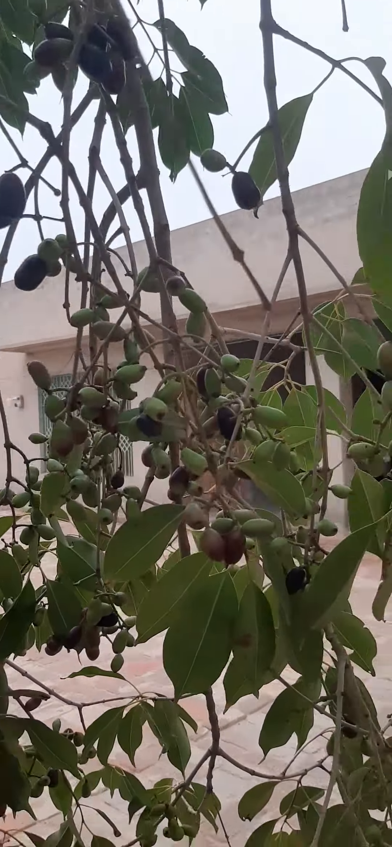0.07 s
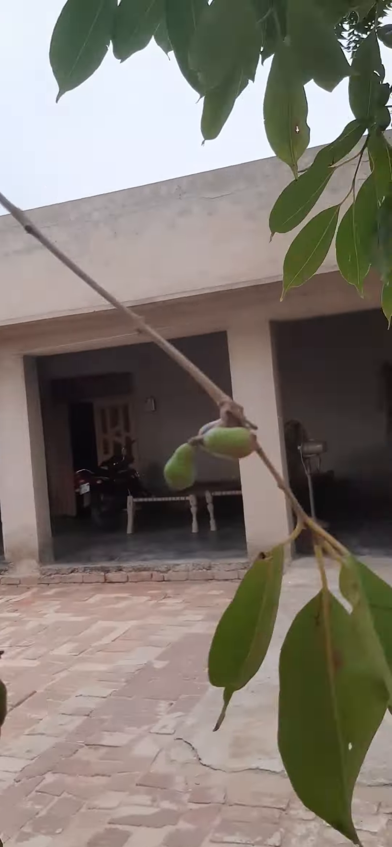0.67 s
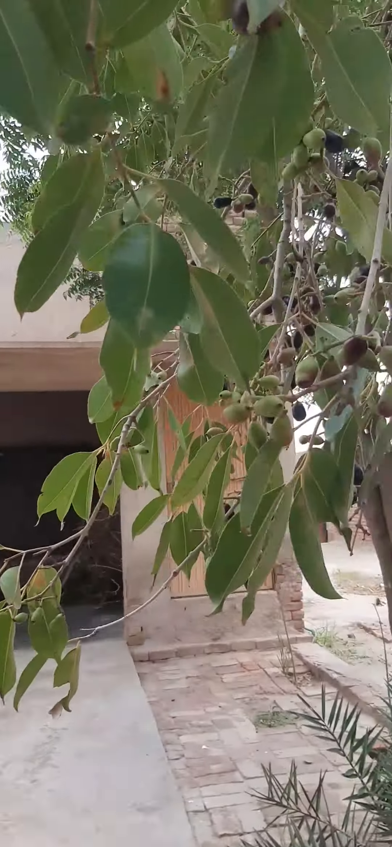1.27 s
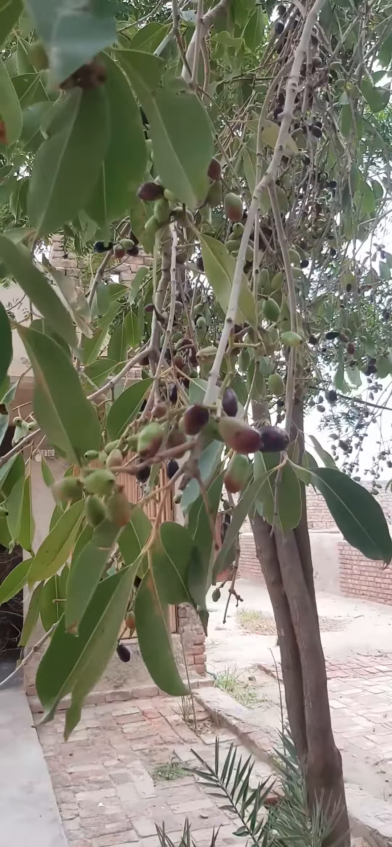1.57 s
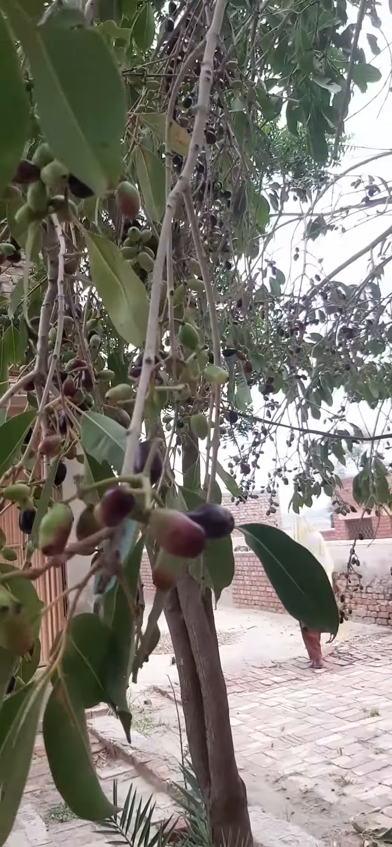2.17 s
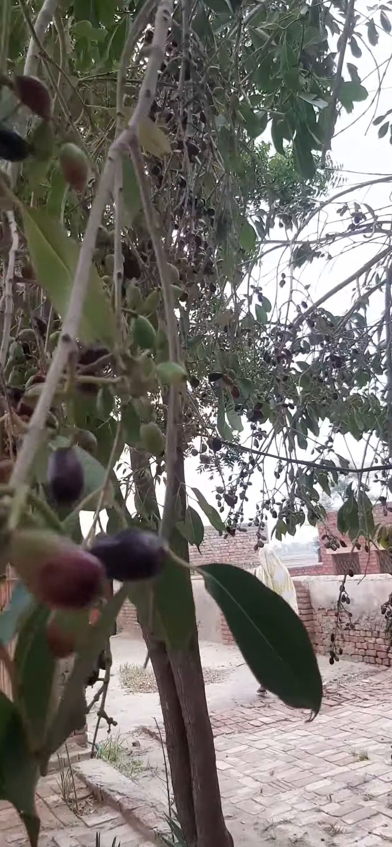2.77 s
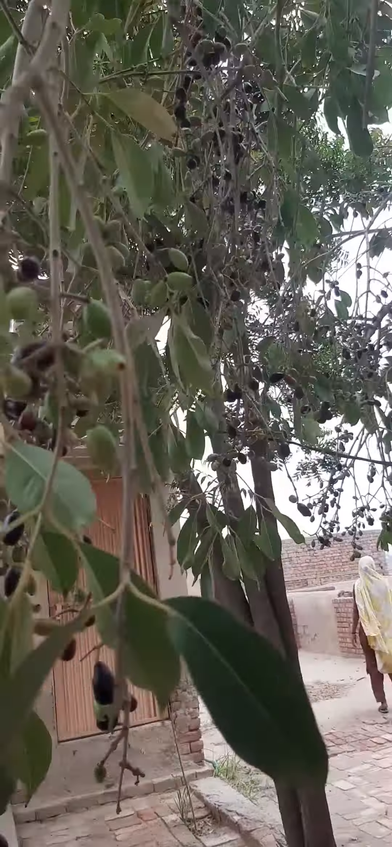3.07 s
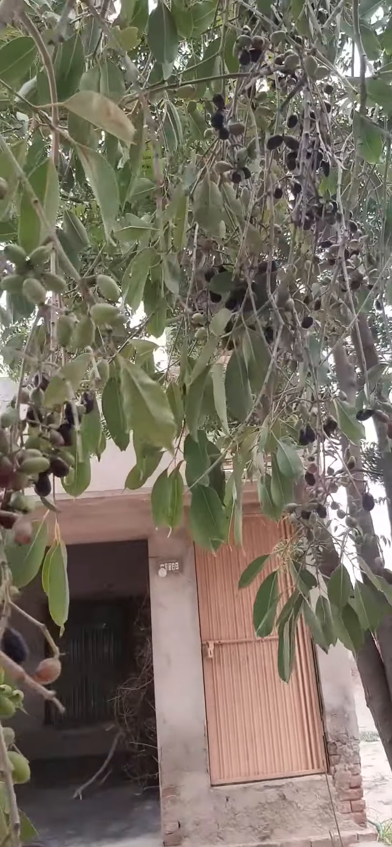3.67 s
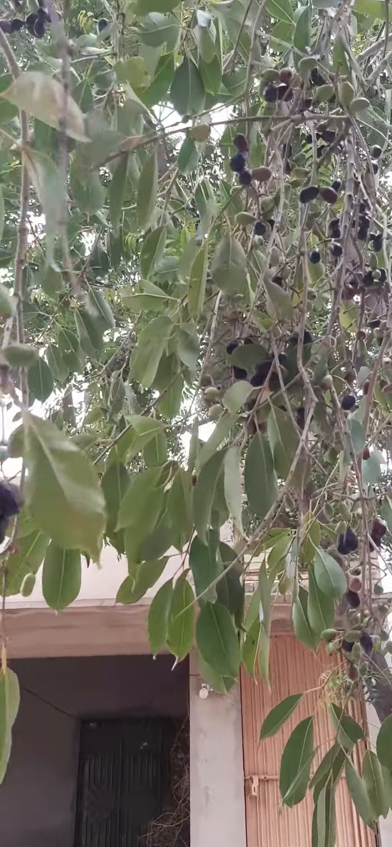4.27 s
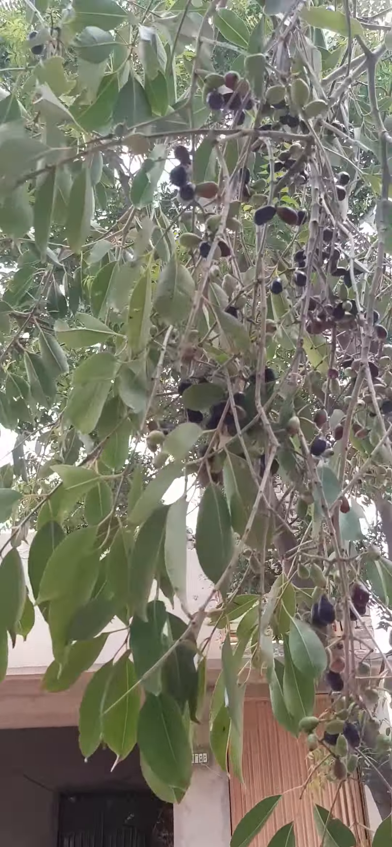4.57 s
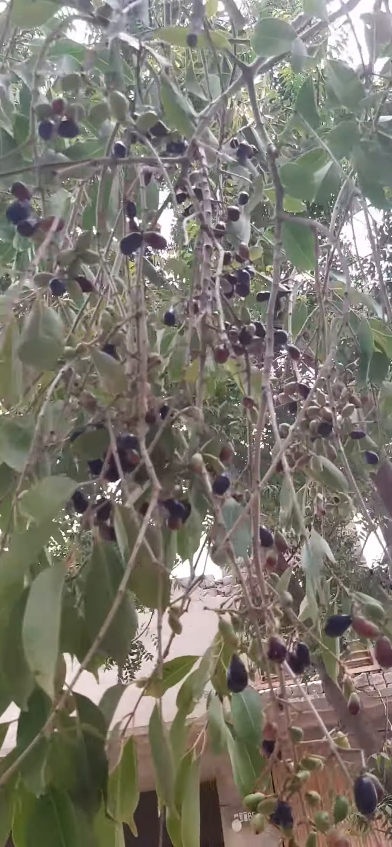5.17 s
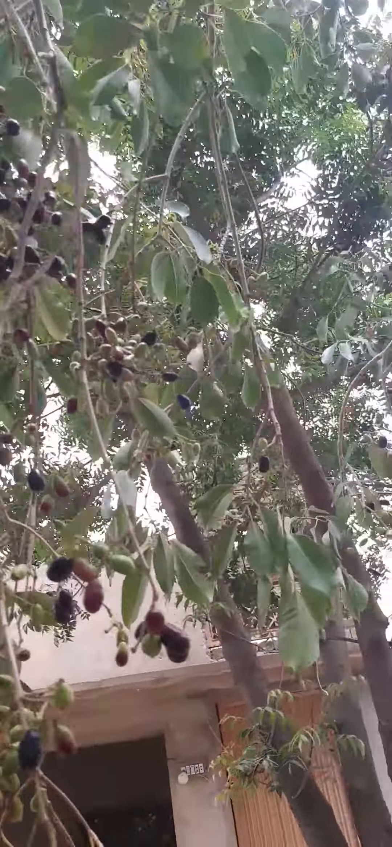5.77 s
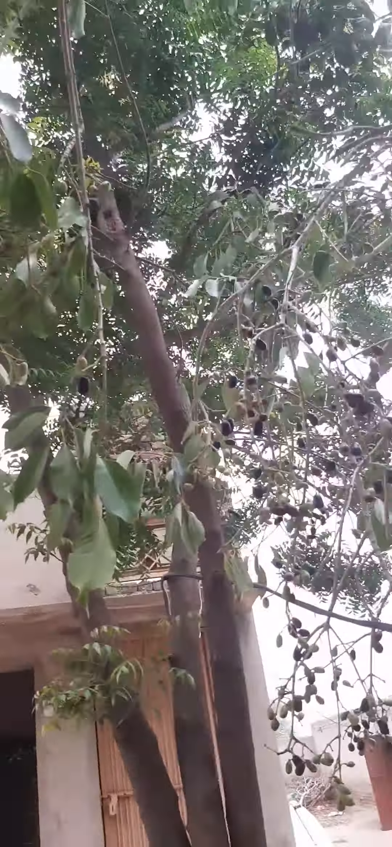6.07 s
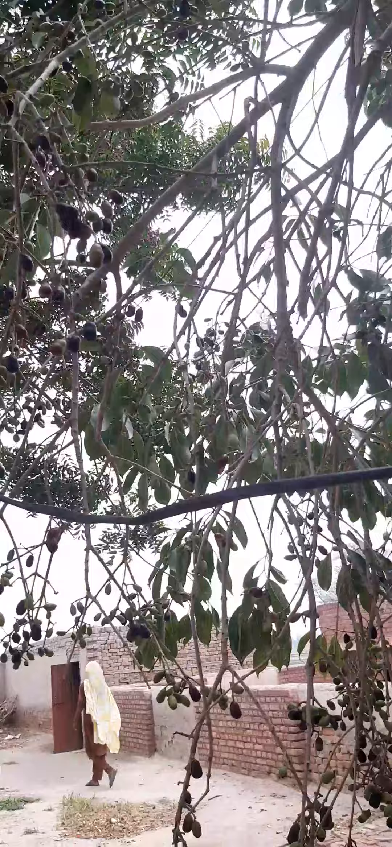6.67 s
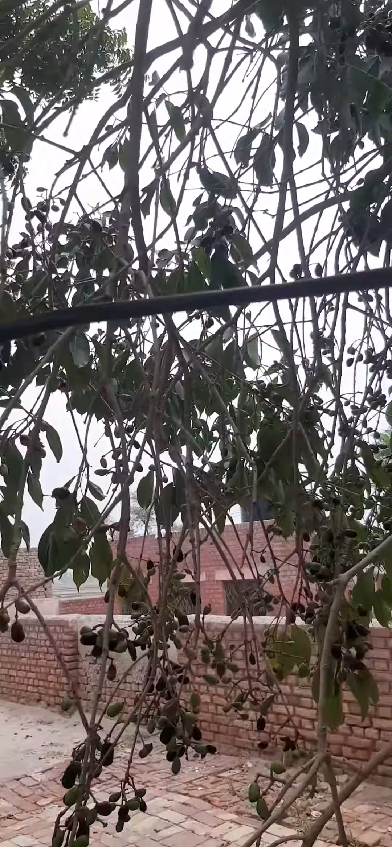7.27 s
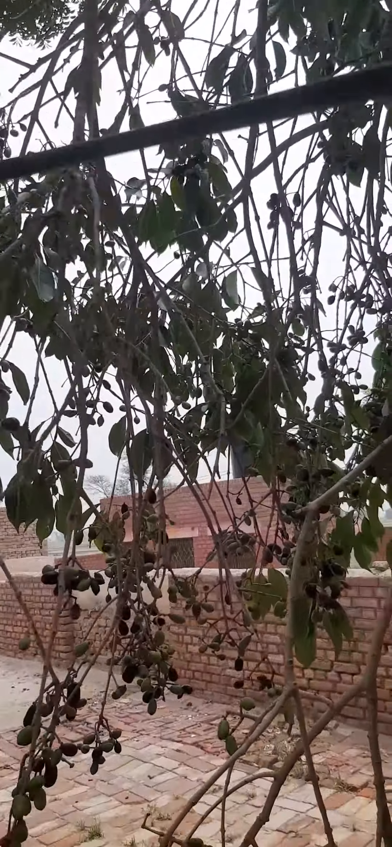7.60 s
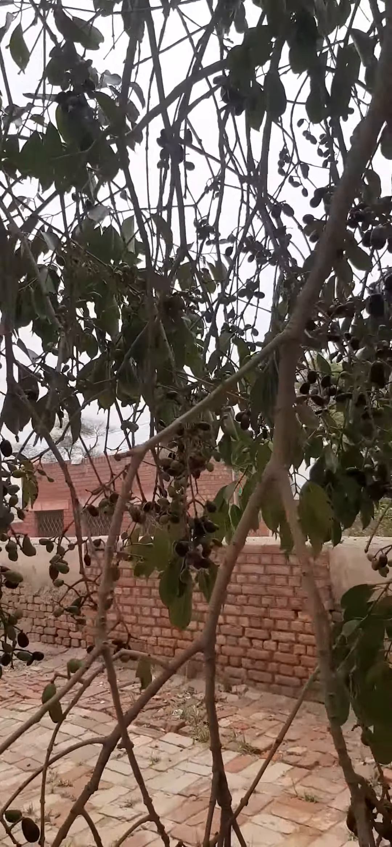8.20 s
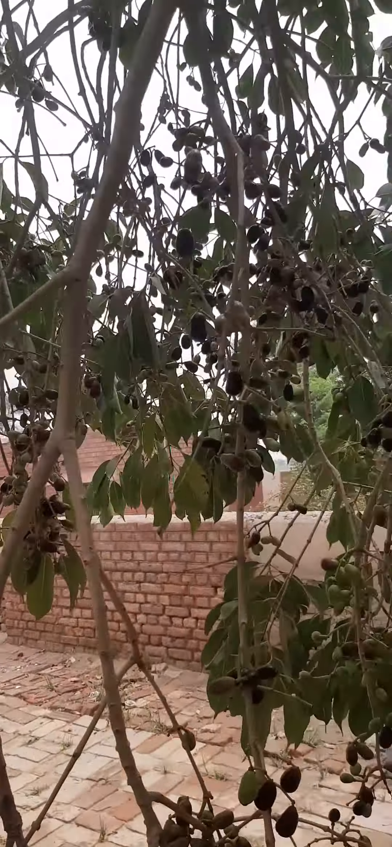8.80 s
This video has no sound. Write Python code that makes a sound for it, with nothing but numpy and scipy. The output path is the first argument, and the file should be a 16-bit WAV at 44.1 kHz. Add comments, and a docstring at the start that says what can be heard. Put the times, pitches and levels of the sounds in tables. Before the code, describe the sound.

Outdoors in a walled yard, a crow caws three times, the middle call softer, then twice after a pause and once near the end. Between calls, leaves swish and twigs click near the microphone, with a few dull handling bumps. Another crow and a few birds sound faintly far off. A low rumble runs throughout, joined in the second half by a distant engine.

```python
"""Crows in a brick courtyard

A crow caws harshly from a tree, its syrinx pulses filtered by throat and beak; the walls scatter and
echo each caw, and a second crow answers from afar. Leaves flick and rustle and twigs click close to a
hand-held microphone, which takes a few soft bumps and knocks. Behind lie a few far birds, a distant
engine that revs and fades, and a low village rumble."""
import sys
import numpy as np
from scipy import signal
from scipy.fft import rfft, irfft, next_fast_len
from scipy.io import wavfile
from scipy.ndimage import uniform_filter1d, minimum_filter1d, map_coordinates

SR = 44100
rng = np.random.default_rng(int(sys.argv[2]) if len(sys.argv) > 2 else 0)


def log_audio(samples):
    """Write samples as a 16-bit WAV file to the path given in sys.argv[1]."""
    # one column per channel
    frames = np.atleast_2d(samples).T
    # limit to full scale, then quantise
    limited = np.clip(frames, -1, 1)
    pcm = np.round(limited * 32767).astype(np.int16)
    wavfile.write(sys.argv[1], SR, pcm)


N = 389844
TIME = np.arange(N) / SR

# Caws: (time [s], length [s], nominal pitch [Hz], scoop time [s], level [dB], rattle rate [Hz],
# throat resonance [Hz], its height [dB], beak resonance [Hz], its height [dB], treble gain [dB],
# left port lag [ms], relative echo level [dB], tail gain [dB])
CAWS = [(0.298, 0.28, 521, .14, -28, 80, 1705, 5, 4100, 14.5, -2, -0.28, -17, -6.5),
        (.575, 0.24, 428.6, 0.029, -44, 72, 760, 6, 4170, 9, -11.5, -0.23, -12.5, -3),
        (1.049, 0.28, 503, 0.086, -28.5, 81, 1740, 4, 4090, 13.5, -1, -0.27, -41, -10),
        (3.88, 0.17, 472.4, .09, -62, 85, 2250, 5, 4200, 4, 3, 0, -30, 2.5),
        (4.305, 0.3, 499.6, 0.092, -29, 72, 1590, 3.5, 4100, 12, -2.5, 0.24, -37, -11),
        (5.07, 0.26, 477.2, 0.073, -27.5, 70.6, 1910, 7, 4170, 9, -2.5, 0.23, -36, -14.5),
        (6.571, .2, 446, .09, -59, 66, 1250, 16.5, 4200, 4, -9, 0, -30, -3),
        (7.164, 0.28, 508.4, 0.094, -50, 62, 1620, 10, 4170, 14, -3, -0.06, -23, 3),
        (8.495, 0.27, 487.5, 0.093, -30.5, 71, 1620, 2, 4220, 7.5, -0.5, -0.22, -4.5, -9)]
def crows():
    """Path difference: a caw reaches the two microphone ports a little apart, then its reflections."""
    out = np.zeros((2, N))
    for s, length, pitch_hz, scoop_s, db, *timbre, lag_ms, echo_db, tail_db in CAWS:
        call = amp(db) * caw(length, pitch_hz, scoop_s, *timbre)
        add(out, s, filtered(call, lambda hz: np.exp(1j * np.pi * np.outer([-1, 1], hz) * lag_ms / 1000)))
        add(out, s, signal.fftconvolve(call[None], courtyard(echo_db, tail_db), axes=1))
    return out


# Response of the throat and open beak: (frequency [Hz], gain [dB])
VOCAL_TRACT = [(520, -40), (750, -16.5), (1020, -17), (1200, -10), (1480, -6), (2000, 0.5), (2250, -6.5),
               (2550, -13.5), (3050, -27), (3650, -26.5), (4400, -23.5), (5200, -20.5), (5900, -14.5),
               (7200, -19), (16000, -38)]
def caw(length, pitch_hz, scoop_s, rattle_hz, throat_hz, throat_db, beak_hz, beak_db, treble_db):
    """Source-filter model: the sound of the syrinx rings through the throat, then the beak."""
    def throat(hz):
        formant_db = throat_db * peak(hz, throat_hz, width=150)
        shelf_db = along([(1900, 0), (3400, treble_db)], hz)
        return amp(along(VOCAL_TRACT, hz) + formant_db + shelf_db)
    voice = filtered(syrinx(length, pitch_hz, scoop_s, rattle_hz), throat)
    return unit(beak(voice, length, beak_hz, beak_db))


# Hiss in the syrinx: (frequency [Hz], mixing share [0-1])
HISS_SHARE = [(2000, .06), (5000, .11)]
def syrinx(length, pitch_hz, scoop_s, rattle_hz, drop_s=.08, attack_s=.066, sag_s=.081):
    """Modulation: an uneven rattle chops the pulses and tugs their pitch, giving harmonics sidebands."""
    size = int(length * SR)
    t = np.arange(size) / SR
    # the pitch scoops up, arches gently and drops away; the effort swells, holds and sags
    bend = 1 - .18 * ramp_down(t, scoop_s) ** 2 - .25 * ramp_down(length - t, drop_s) ** 2
    bend *= 1 + .06 * (np.sin(np.pi * t / length) - np.sin(np.pi / 3))
    effort_db = -20.5 * ramp_down(t, attack_s) ** 2 - 6.5 * ramp_down(length - t, sag_s)
    flap = phase_of(rattle_hz * (1 + .15 * wobble(89.9, size)))
    jitter = .018 * wobble(500, size)
    phase = phase_of(pitch_hz * bend * (1 + .05 * np.sin(flap) + jitter))
    pulses = unit(np.cos(np.outer(np.arange(1, 31), phase)).sum(0))
    hiss = unit(rng.standard_normal(size) * (1 + np.cos(phase)))
    voiced = filtered(pulses, lambda hz: np.sqrt(1 - along(HISS_SHARE, hz)))
    rasp = filtered(hiss, lambda hz: np.sqrt(along(HISS_SHARE, hz)))
    chop = np.exp(.35 * np.cos(flap))
    edges = np.clip(np.minimum(t, length - t) / .0016, 0, 1)
    return (voiced + rasp) * amp(effort_db) * chop * edges


# Upper resonances of the beak: (starting frequency [Hz], half-width [Hz], height [dB])
BEAK_FORMANTS = [(5870, 170, 2.5), (6430, 180, 2)]
def beak(x, length, beak_hz, beak_db, climb=.125, flicker_db=3, sag_db=3):
    """Formant shift: resonances climb as the beak opens; the treble flickers and dulls as air runs out."""
    hz, frames, spectra = signal.stft(x, SR, nperseg=512)
    progress, hz = frames / length, hz[:, None]
    rise = 1 + climb * progress ** 2
    formants = [(beak_hz, 145, beak_db), *BEAK_FORMANTS]
    db = sum(height * peak(hz, start_hz * rise, width) for start_hz, width, height in formants)
    patches = uniform_filter1d(rng.standard_normal(spectra.shape), size=3, axis=0)
    patches = unit(uniform_filter1d(patches, size=7, axis=1))
    treble = along([(2500, .15), (4000, 1)], hz)
    db += (flicker_db * patches - sag_db * (progress - .5)) * treble
    return signal.istft(spectra * amp(db), SR, nperseg=512)[1][:len(x)]


# Reverberation of the yard: (frequency [Hz], T60 [s])
YARD_DECAY = [(200, 0.87), (1500, 0.71), (2400, 0.62), (5000, 0.56), (14000, 0.17)]
def courtyard(echo_db, tail_db, near_db=-1, near_t60=.28, echo_s=.31, echo_spread_s=.13):
    """Impulse response: early reflections off walls and leaves, a diffuse tail and a far wall's echo."""
    t = np.arange(SR) / SR
    hz, frames, spectra = signal.stft(rng.standard_normal((2, SR)), SR, nperseg=256)
    spectra *= decay(frames, along(YARD_DECAY, hz)[:, None])
    tail = signal.istft(spectra, SR, nperseg=256)[1][:, :SR]
    sparse = rng.standard_normal((2, SR)) * (rng.random((2, SR)) < .01)
    near = coloured(sparse * decay(t, near_t60) * (t > .002), [(2000, -.31), (4500, -.2)])
    echo = rng.standard_normal((2, SR)) * np.exp(-((t - echo_s) / echo_spread_s) ** 2)
    far = coloured(echo, [(800, 14), (1800, 9), (4000, -15)])
    return (amp(near_db) * near + amp(tail_db) * unit(tail) + amp(echo_db - 11.5) * far) / np.sqrt(SR)


# Leaf flicks: (time [s], swish level [dB], tick over swish [dB], stalk knock level [dB])
FLICKS = [(1.667, -40.5, 3, -47), (2.253, -47.5, 6, -70), (2.574, -34, 2, -41), (2.743, -34, 7.5, -56),
          (3.234, -35, 6.5, -56), (3.713, -36.5, 8, -43), (5.522, -65, 1, -42.5), (5.642, -70, 3, -51.5),
          (5.998, -44.5, -1, -45.5), (6.61, -52, 3, -50), (6.748, -46.5, 3, -51), (6.988, -45, 4, -42.5),
          (7.034, -39.5, 2, -40), (7.419, -46, -3, -38.5), (7.82, -46.5, 5, -51), (7.976, -47.5, 6, -44),
          (8.472, -57, -1, -60)]
# Spectrum of leaf contact: (frequency [Hz], relative level [dB])
LEAF_SPECTRUM = [(300, -13), (2000, -6.5), (3200, -8.5), (5000, 2), (6500, 5.5), (10000, 4.5), (15500, 4.5)]
def leaf_flicks(tick_t60=.022, swish_t60=.38, stalk_t60=.17, crackle_db=2, echo_s=.079):
    """Impact: a leaf snaps free with a tick and a stalk knock, and a swish decays after it."""
    out, t = np.zeros((2, N)), np.arange(SR // 3) / SR
    stalk_spectrum = [(500, -4), (1600, 0), (6000, 3), (9000, 9.5), (13000, -13)]
    for s, db, tick_db, knock_db in FLICKS:
        tick = amp(tick_db) * decay(t, tick_t60)
        swish = amp(crackle_db * wobble(1500, len(t))) * decay(t, swish_t60)
        leaf = amp(db) * coloured(rng.standard_normal((2, len(t))), LEAF_SPECTRUM)
        stalk = amp(knock_db) * coloured(rng.standard_normal((2, len(t))), stalk_spectrum)
        add(out, s, (tick + swish) * leaf + decay(t, stalk_t60) * stalk)
        add(out, s + echo_s, amp(tick_db - 2) * decay(t, .011) * leaf)  # a wall returns the tick's edge
    return panned(1) * out


# Lulls in the rustling: (time [s], length [s], depth [dB])
LULLS = [(0.725, 0.27, 10), (4.7, 2.6, 5.5), (8.026, 0.23, 20)]
def rustle(level_db=-59, touches_per_s=9, touch_db=5, touch_t60=.31, attack_s=.0035, crackle_db=2):
    """Friction noise: foliage hisses finely, swelling at random touches that rise fast and die away."""
    db = level_db - 2.4 * wobble(3.17) - sum(depth * arch(s, length) for s, length, depth in LULLS)
    touches = rng.random(N) < touches_per_s / SR
    t = np.arange(SR // 3) / SR
    touch = amp(touch_db) * decay(t, touch_t60) * (1 - np.exp(-t / attack_s))
    contact = .5 + signal.fftconvolve(touches, touch)[:N]
    grains = rng.standard_normal((2, N)) * amp(crackle_db * wobble(630))
    return amp(db) * contact * panned(-2) * coloured(grains, LEAF_SPECTRUM)


# Twig clicks: (time [s], relative level [dB])
TWIG_CLICKS = [(5.512, -40), (5.522, -27.5), (5.527, -34), (5.5315, -34), (5.55, -43), (2.802, -37),
               (3.741, -44)]
# Modes of a twig: (frequency [Hz], gain [dB], T60 [s])
TWIG_MODES = [(2350, -9.5, 0.032), (3553, -20.5, 0.058), (5140, -5, 0.015), (5570, 3, .005),
              (6370, -3, .007), (11000, -5, .006), (13730, -9, .004)]
def twigs():
    """Impulse excitation: twigs crack and ring, singly or in a quick run."""
    return amp(-4.5) * struck(TWIG_CLICKS, TWIG_MODES, crack_db=5, crack_t60=.0062)


# Finger knocks: (time [s], level [dB])
KNOCKS = [(.041, -42), (.048, -46)]
# Modes of the microphone casing: (frequency [Hz], gain [dB], T60 [s])
CASING_MODES = [(725, -5, .03), (1150, -0.5, 0.019), (1470, -9, .02), (2150, -12, .012)]
def knocks():
    """Structure-borne sound: fingers tap the casing and ring its damped modes."""
    return struck(KNOCKS, CASING_MODES, crack_db=-8, crack_t60=.006)


# Bumps on the microphone body: (time [s], level [dB], frequency [Hz])
BUMPS = [(.265, -27, 94), (.7, -31, 103), (1.348, -23.5, 99), (7.672, -21.5, 79), (7.864, -20.5, 109),
         (7.925, -25, 88.4)]
def bumps(width_s=.006, right_db=-16):
    """Handling noise: each bump is a cycle or two of low-frequency pressure, mostly at the left port."""
    out, t = np.zeros(N), np.arange(-SR // 30, SR // 30) / SR
    for s, db, hz in BUMPS:
        add(out, s + t[0], amp(db) * np.sin(2 * np.pi * hz * t) * np.exp(-(t / width_s) ** 2))
    return out * amp([[0], [right_db]])


# Soft scuffs: (time [s], length [s], level [dB], centre [Hz], half-width [octaves])
SCUFFS = [(.0, 0.089, -48, 1340, 12), (1.661, .5, -61.5, 845, 1.3), (2.248, 0.59, -56, 1240, 2.1),
          (3.135, 0.37, -54.5, 363, 1.1), (3.181, 0.19, -56, 1095, 0.12), (3.801, 0.38, -50.5, 1920, 1.4),
          (4.805, 0.18, -56.5, 6000, 0.77), (6.215, .42, -50.5, 5560, 0.68), (6.387, 0.24, -49.5, 1800, 1),
          (7.155, 0.17, -51.5, 5530, 1.5), (7.642, 0.15, -47, 4470, 1.4)]
def scuffs(grit_db=1.5):
    """Band-limited friction noise: short gritty scrapes swell and fade."""
    out = np.zeros((2, N))
    for s, length, db, centre_hz, octaves in SCUFFS:
        size = int(length * SR)
        grit = rng.standard_normal((2, size)) * amp(grit_db * wobble(121.9, size))
        scrape = unit(filtered(grit, lambda hz: peak(np.log2((hz + 1) / centre_hz), 0, octaves)))
        add(out, s, amp(db) * scrape * np.sin(np.linspace(0, np.pi, size)))
    return out


# Notes of far birds: (time [s], length [s], pitch [Hz], level [dB], waver [share of pitch])
BIRD_NOTES = [(4.042, 0.044, 1900, -55, .07), (5.57, .13, 820, -62, 0.0088), (5.7, .11, 1160, -66, .015)]
def far_birds():
    """Frequency modulation: short tones waver at random, softened by the yard's reverberation."""
    out = np.zeros((2, N))
    for s, length, hz, db, waver in BIRD_NOTES:
        size = int(length * SR)
        phase = phase_of(hz * (1 + waver * wobble(397, size)))
        note = amp(db) * np.sin(phase) * np.sin(np.linspace(0, np.pi, size))
        add(out, s, note)
        add(out, s, signal.fftconvolve(note[None], courtyard(echo_db=-30, tail_db=-8), axes=1))
    return out


# Engine speed: (time [s], firing rate [Hz], evenness [0-1])
ENGINE_SPEED = [(5.8, 73, .15), (6.0, 76.5, .3), (6.17, 79.6, .9), (6.4, 78.4, .93), (6.57, 76.6, .85),
                (6.7, 72.5, .5), (6.83, 64.5, .35), (7.0, 64.6, .7), (7.12, 63.6, .7), (7.2, 66.5, .75),
                (7.38, 63.8, .75), (7.55, 54, .5), (7.87, 49.5, .4), (8.2, 54.5, .9), (8.42, 64, .88)]
def engine_firings(strength_spread_db=2, street_t60=.3):
    """Scattering: the streets smear a train of firing pulses; noise takes over as evenness falls."""
    rate, evenness = curves(ENGINE_SPEED)
    count = np.floor(np.cumsum(rate * (1 + .001993 * wobble(12))) / SR)
    firings = np.diff(count, prepend=0) * amp(strength_spread_db * rng.standard_normal(N))
    t = np.arange(SR // 4) / SR
    streets = rng.standard_normal((2, len(t))) * decay(t, street_t60)
    scattered = signal.fftconvolve(firings[None], streets, axes=1)[:, :N]
    pulses = unit(unit(firings) + .5 * unit(scattered))
    return np.sqrt(evenness) * pulses + np.sqrt(1 - evenness) * rng.standard_normal((2, N))


# Loudness of the engine: (time [s], relative level [dB])
ENGINE_LEVEL = [(5.5, -87), (5.82, -66), (5.89, -53.5), (6.15, -57.5), (6.6, -55), (6.85, -57), (7.1, -54),
                (7.4, -53), (7.58, -61.5), (7.93, -63.5), (8.23, -59), (8.4, -53), (8.8, -57)]
# Responses of the exhaust and of the buzz: (frequency [Hz], relative gain [dB])
EXHAUST_RESPONSE = [(450, -37), (680, -12.5), (800, -5.5), (890, -15), (960, 1), (1030, 3.5), (1110, -10),
                    (1290, -5.5), (1550, -22), (3000, -22.5), (6000, -53)]
BUZZ_RESPONSE = [(1800, -7), (2250, 5), (2530, 23), (2800, -3), (3400, -33)]
def engine(pipe_hz=978, pipe_t60=.03, ring_db=-4.5, buzz_db=-6):
    """Forced resonance: firings ring a distant exhaust pipe, with a brief buzz under full load."""
    source = engine_firings()
    t = np.arange(SR // 10) / SR
    pipe = np.sin(2 * np.pi * pipe_hz * t) * decay(t, pipe_t60)
    ring = amp(ring_db) * unit(signal.fftconvolve(source, pipe[None], axes=1)[:, :N])
    buzz = amp(buzz_db) * arch(s=5.88, length=.52) * coloured(source, BUZZ_RESPONSE)
    db, = curves(ENGINE_LEVEL)
    fade_in = np.clip((TIME - ENGINE_LEVEL[0][0]) * 10, 0, 1)
    return amp(db + 2 + .5 * wobble(11)) * fade_in * (ring + coloured(source, EXHAUST_RESPONSE) + buzz)


# Slow drift of the rumble: (time [s], relative level [dB])
RUMBLE_DRIFT = [(0.0, -49), (0.86, -45), (1.55, -49), (5.05, -48.5), (5.22, -43), (5.46, -50),
                (5.88, -47.5), (7.53, -45), (7.88, -44.5), (8.3, -47.5), (8.84, -44.5)]
# Spectra of the rumble and the open air: (frequency [Hz], relative level [dB])
RUMBLE_SPECTRUM = [(20, -51), (42, -6.5), (90, -4), (140, 4), (170, -6), (210, -13), (300, -12), (500, -27),
                   (1000, -27.5), (4000, -71)]
AIR_SPECTRUM = [(100, 5), (500, -1), (900, -4), (1500, -2), (3000, -10.5), (6000, -9.5), (16000, -35)]
def village(rumble_db=-47, air_db=-59):
    """Coherence: the ports share the rumble, but air is diffuse and buffeting falls mostly on the left."""
    drift_db, = curves(RUMBLE_DRIFT)
    db = rumble_db + drift_db - drift_db.mean() + wobble(4.4)
    coherent = rng.standard_normal(N) + .13 * rng.standard_normal((2, N))
    rumble = amp(db) * panned(.5) * coloured(coherent, RUMBLE_SPECTRUM)
    buffet = coloured(rng.standard_normal((2, N)), [(20, -47), (45, -6), (95, 3.5), (200, -14), (500, -35.5)])
    air = coloured(rng.standard_normal((2, N)) + .55 * rng.standard_normal(N), AIR_SPECTRUM)
    buffet *= amp(db - 2 + 2 * wobble(7)) * amp([[0], [-10]])
    return rumble + buffet + amp(air_db + wobble(2.63)) * air


def struck(hits, modes, crack_db, crack_t60):
    """Modal superposition: each hit gives a noise crack and a sum of damped sines."""
    out, t = np.zeros((2, N)), np.arange(SR // 10) / SR
    for s, db in hits:
        ring = np.zeros((2, len(t)))
        for hz, mode_db, t60 in modes:
            envelope = amp(mode_db + rng.normal(0, 2.2, (2, 1))) * decay(t, t60)
            ring += envelope * np.sin(2 * np.pi * hz * t + rng.random((2, 1)) * np.pi)
        crack = amp(crack_db) * decay(t, crack_t60) * rng.standard_normal((2, len(t)))
        add(out, s, amp(db) * (ring + crack))
    return out


def amp(db):
    """Amplitude ratio of a level."""
    return 10 ** (np.asarray(db) / 20)


def unit(x):
    """Normalisation to rms 1."""
    return x / np.sqrt(np.mean(x ** 2) + 1e-20)


def decay(t, t60):
    """Exponential decay, 60 dB in t60 seconds."""
    return amp(-60 * t / t60)


def ramp_down(t, length):
    """Linear fall from 1 to 0."""
    return np.maximum(1 - t / length, 0)


def phase_of(hz):
    """Phase as the integral of frequency."""
    return 2 * np.pi * np.cumsum(hz) / SR


def peak(x, centre, width):
    """Lorentzian resonance of height 1."""
    return 1 / (1 + ((x - centre) / width) ** 2)


def arch(s, length):
    """Half sine of height 1, starting at time s."""
    return np.sin(np.pi * np.clip((TIME - s) / length, 0, 1))


def along(points, hz):
    """Interpolation on a log frequency axis."""
    knots_hz, values = np.transpose(points)
    return np.interp(np.log(hz + 1), np.log(knots_hz + 1), values)


def curves(rows):
    """Linear interpolation in time of each column after the first."""
    times, *columns = np.transpose(rows)
    return [np.interp(TIME, times, column) for column in columns]


def wobble(rate, size=N):
    """Smooth random curve, rate knots a second."""
    return map_coordinates(rng.standard_normal(int(size * rate / SR) + 4), [np.arange(size) * rate / SR])


def filtered(x, response):
    """Filtering by multiplication of the spectrum."""
    n = x.shape[-1]
    padded = next_fast_len(n + SR // 10)
    return irfft(rfft(x, padded) * response(np.fft.rfftfreq(padded, 1 / SR)), padded)[..., :n]


def coloured(x, points):
    """Spectral shaping by (frequency [Hz], gain [dB]) points, at rms 1."""
    return unit(filtered(x, lambda hz: amp(along(points, hz))))


def panned(db):
    """Left and right gains for a level difference."""
    return amp([[db / 2], [-db / 2]])


def add(track, s, x):
    """Superposition of x on the track at time s."""
    start = max(round(s * SR), 0)
    part = track[..., start:start + x.shape[-1]]
    part += x[..., :part.shape[-1]]


def scene():
    """Superposition of all the sources in the yard."""
    return (crows() + far_birds() + leaf_flicks() + twigs() + knocks() + rustle() + scuffs() + bumps()
            + village() + engine())


# Notch of the microphone ports: (frequency [Hz], gain [dB])
PORT_NOTCH = [(6000, 0.5), (7200, -2), (8000, -16.5), (8600, -24), (9600, -10.5), (12000, -0.5),
              (15000, 0.5)]
# Colour of the two ports: (frequency [Hz], left over right [dB])
PORT_BALANCE = [(50, 7), (250, 2.5), (550, 7.5), (1000, 3), (1500, -1.5), (2100, -0.5), (4500, 5),
                (8000, 0.5), (13000, -4.5)]
def record(dry, ceiling=.26, top_hz=16000):
    """Transducer response: the ports colour the sound, a limiter holds peaks, a low-pass ends the band."""
    def ports(hz):
        return amp(along(PORT_NOTCH, hz) + np.outer([.5, -.5], along(PORT_BALANCE, hz)))
    ported = filtered(dry, ports)
    needed = np.minimum(1, ceiling / (np.abs(ported).max(0) + 1e-9))
    gain = uniform_filter1d(minimum_filter1d(needed, size=300), size=300)
    return filtered(ported * gain, lambda hz: hz < top_hz)


dry = scene()
out = record(dry)
log_audio(out)
```